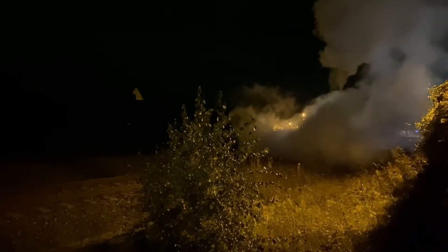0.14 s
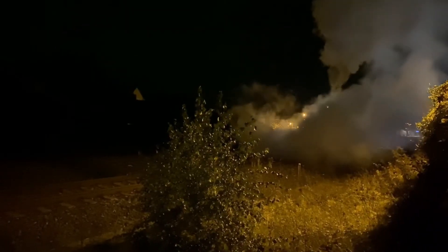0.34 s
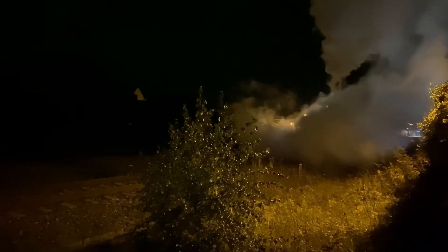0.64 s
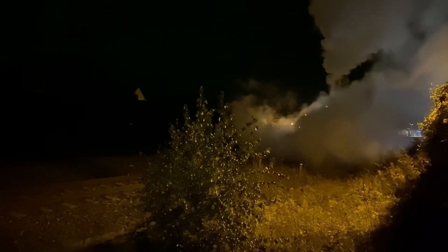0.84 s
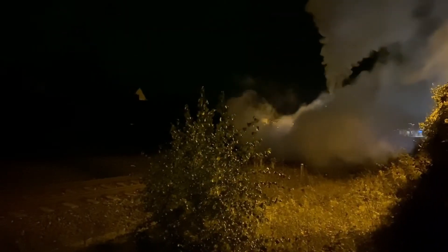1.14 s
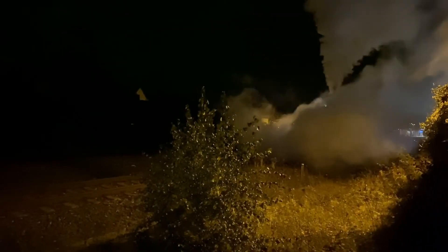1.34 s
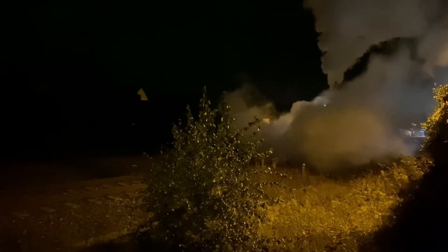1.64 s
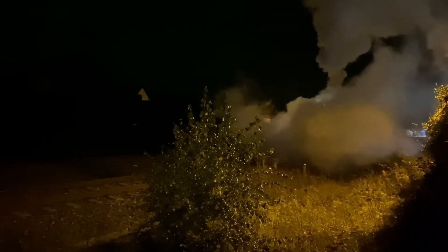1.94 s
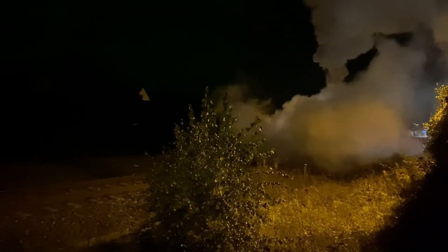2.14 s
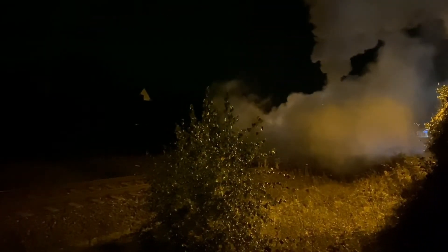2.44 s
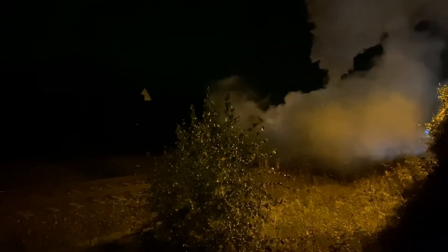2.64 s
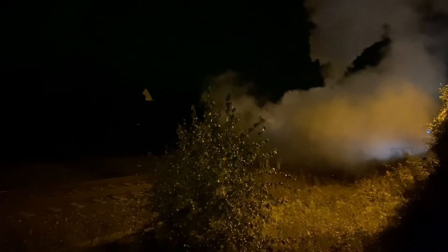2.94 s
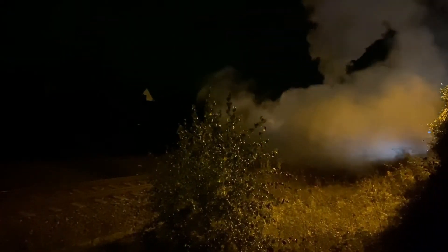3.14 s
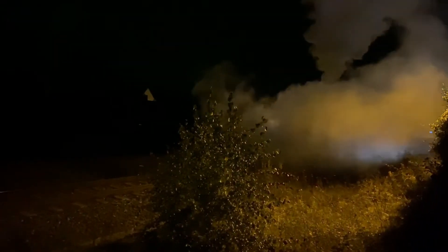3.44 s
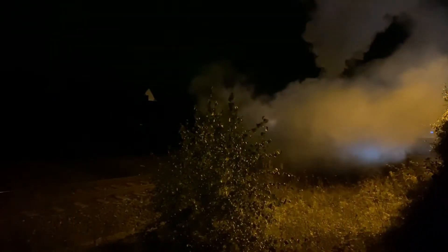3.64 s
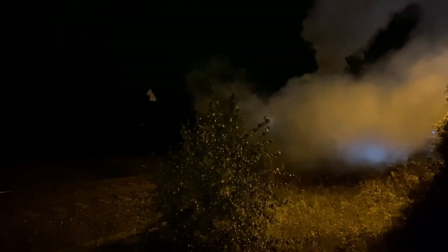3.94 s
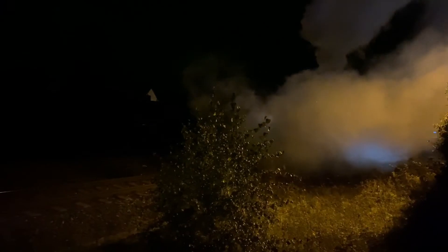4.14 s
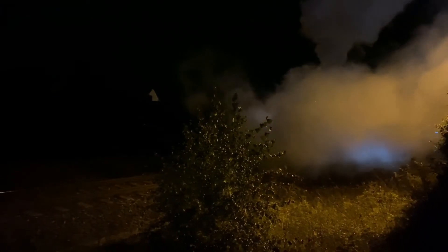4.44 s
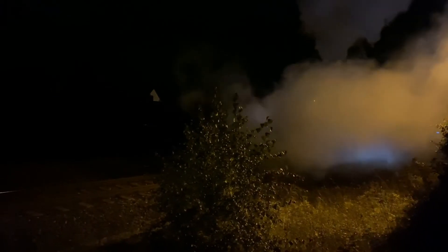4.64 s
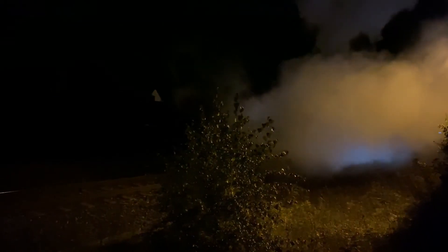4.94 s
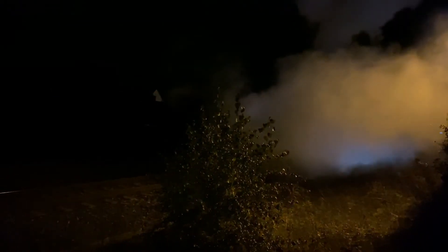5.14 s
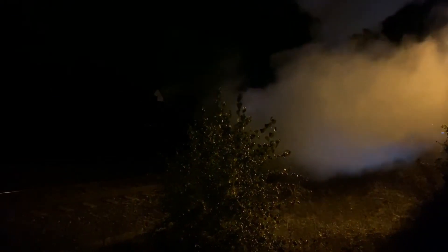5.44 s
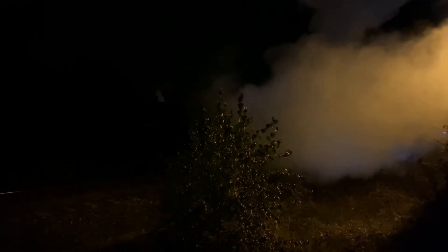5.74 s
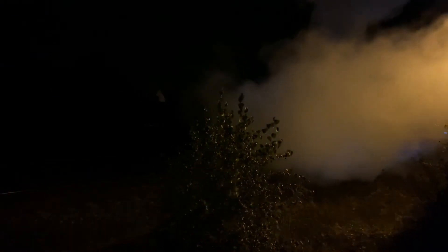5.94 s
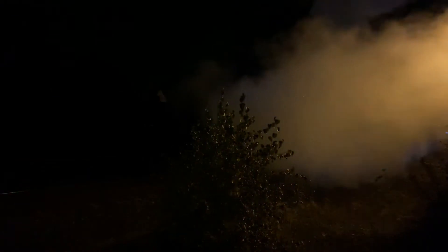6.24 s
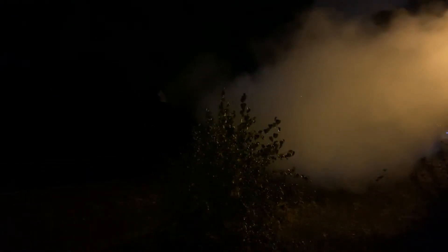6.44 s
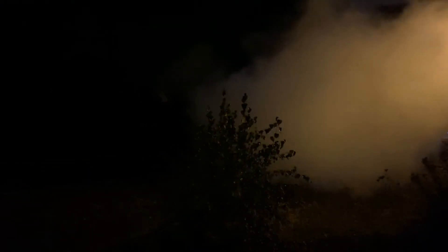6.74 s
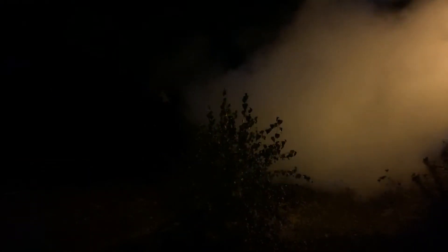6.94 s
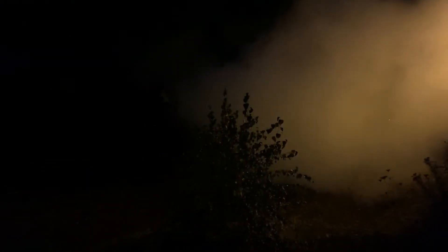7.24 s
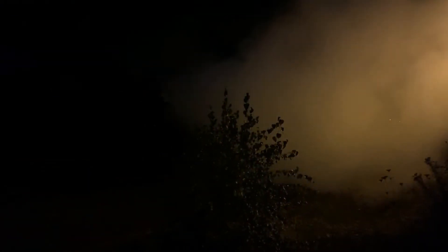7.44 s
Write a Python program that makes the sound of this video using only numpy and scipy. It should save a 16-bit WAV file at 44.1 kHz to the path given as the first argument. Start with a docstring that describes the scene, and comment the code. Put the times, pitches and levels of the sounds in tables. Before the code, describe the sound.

A steam engine blows off a loud, steady, slightly wavering hiss outdoors at night, then shuts off suddenly, leaving low rumble and soft chuffs.

```python
"""Steam blow-off at night

A steam locomotive blows off steam across a field, heard from beside a wall. The jet is coloured noise,
combed by the wall's reflection and shaken by moving air; it swells, is shut off and dies away among the
trees as decaying noise echoes. Noise makes the low rumble and soft chuffs under and after it; sine waves
make a faint hum and a wavering drone."""
import sys
import numpy as np
from scipy import signal
from scipy.fft import rfft, irfft
from scipy.io import wavfile
from scipy.ndimage import uniform_filter1d

SR = 44100
rng = np.random.default_rng(int(sys.argv[2]) if len(sys.argv) > 2 else 0)


def transcribe(u):
    """Save the signal u as a 16-bit wav file named by the first command-line argument.

    u: samples, shape (n,) or (channels, n), limited to [-1, 1]; the rate is SR.
    q: integer samples, one column per channel.
    """
    v = np.clip(np.atleast_2d(u).T, -1, 1)
    q = np.round(v * 32767).astype(np.int16)
    wavfile.write(sys.argv[1], SR, q)


N = 333836
TIME, FREQ = np.arange(N) / SR, np.fft.rfftfreq(N, 1 / SR)  # s, Hz
FRAME, HOP = 1024, 256  # short-time spectrum, samples
HISS_BAND_HZ = (2700, 6000)  # band in which the source hiss has rms 1

# Colour of the jet. Each row: frequency in Hz, relative density in dB per Hz.
JET_COLOUR = [(200, -29.5), (420, -23), (760, -3), (1300, -1.9), (1750, -0.5), (2600, -1), (3400, 0.63),
              (5000, -1), (6500, -0.5), (8100, 1.5), (9200, 0.5), (10300, -1.3), (12500, -12),
              (15000, -14.5)]


def undb(db):
    """Decibels to amplitude gain."""
    return 10 ** (np.asarray(db) / 20)


def over_time(table, t=TIME):
    """The columns of a curve table at times t, joined by straight lines."""
    s, *columns = np.transpose(table)
    return [np.interp(t, s, c) for c in columns]


def over_pitch(table, hz=FREQ):
    """The columns of a spectrum table, joined by lines on a log-frequency axis."""
    points, *columns = np.transpose(table)
    return [np.interp(np.log(hz + 1), np.log(points), c) for c in columns]


def bell(x, centre, width):
    """A smooth Gaussian bump of height 1; width is its standard deviation."""
    return np.exp(-.5 * ((x - centre) / width) ** 2)


def ramp(t, start, length):
    """Rises from 0 to 1, then holds."""
    return np.clip((t - start) / length, 0, 1)


def walk(t, rate):
    """Random values, rate of them a second, joined by straight lines."""
    return np.interp(t * rate, np.arange(2048), rng.standard_normal(2048))


def noise(colour, band=(0, SR)):
    """Spectrum of coloured noise whose rms inside the band is 1."""
    spectrum = rfft(rng.standard_normal(N)) * undb(over_pitch(colour)[0])
    in_band = (FREQ > band[0]) * (FREQ < band[1])
    return spectrum / np.std(irfft(spectrum * in_band, N))


def diffuse(colour, wide_hz, band=(0, SR)):
    """Stereo noise from all around: alike in the bass, unrelated above wide_hz."""
    side = noise(colour, band) * np.minimum(FREQ / wide_hz, 1)
    return irfft(noise(colour, band) + side * np.array([[1], [-1]]), N)


def effort_db():
    """The engine works up slowly to its full level, then eases a little."""
    idle_db, work_db, work_up_s = -58, -48, 3.9
    ease_s, ease_ramp_s, ease_db = 5.7, 0.37, -0.9
    working = idle_db + (work_db - idle_db) * ramp(TIME, 0, work_up_s)
    return working + ease_db * ramp(TIME, ease_s, ease_ramp_s)


def hum(waver, throb_db):
    """Faint tones near 200 and 320 Hz: sines whose pitch and level waver a little."""
    # Each row: frequency in Hz, level in dB relative to the engine.
    hum_tones = [(199, -18), (321, -19.5)]
    total = 0
    for hz, db in hum_tones:
        phase = 2 * np.pi * np.cumsum(hz * (1 + waver * walk(TIME, 4))) / SR
        total = total + np.sin(phase) * undb(effort_db() + db + throb_db * walk(TIME, 5))
    return np.sqrt(2) * total


def drone(waver, throb_db, count):
    """A low drone slides up and down; each of its harmonics booms when it passes a resonance."""
    # Pitch of the fundamental. Each row: time in seconds, frequency in Hz.
    drone_pitch = [(0, 40.9), (1, 42.15), (1.5, 44.9), (2.1, 47.67), (2.45, 49.8), (2.75, 52.64),
                   (3, 58.05), (3.3, 62.35), (3.55, 67.4), (4.1, 66), (4.6, 66.6), (5.0, 46.96),
                   (5.3, 41.25), (5.75, 41.23), (6.2, 44.1), (6.55, 46.7), (6.9, 49.3), (7.55, 52.5)]
    # Drone level. Each row: time in seconds, level in dB relative to the engine.
    drone_level = [(0, 2), (.7, -6.5), (1.5, 1.5), (2.4, 3), (3.3, 3), (4.4, -1), (4.8, -12), (5.15, -1),
                   (5.35, 2), (5.7, 0.5), (5.95, -2), (6.25, 1), (6.5, 3), (6.8, -0.5), (7.2, -2),
                   (7.55, -0.5)]
    # Resonances. Each row: centre in Hz, half-width in Hz, peak in dB before the drone level is added.
    booms = [(54.6, 2.2, -6.5), (83.6, 1.9, -2), (96, 4, -3), (129.2, 4.5, -8), (161, 3.2, -15.5),
             (202, 3.4, -8.5), (313.5, 15.4, -13.5)]
    hz = over_time(drone_pitch)[0]
    phase = 2 * np.pi * np.cumsum(hz * (1 + waver * walk(TIME, 14))) / SR

    def boom(f):
        """Gain at frequency f: the powers of all resonances added."""
        power = sum(undb(db) ** 2 / (1 + ((f - centre) / width) ** 2) for centre, width, db in booms)
        return np.sqrt(power)

    tone = sum(boom(k * hz) * np.sin(k * phase) for k in range(1, count + 1))
    level_db = effort_db() + over_time(drone_level)[0] + throb_db * walk(TIME, 3.7)
    return np.sqrt(2) * tone * undb(level_db)


def rumble(level_db, throb_db, wide_hz):
    """Fire and draught rumble unevenly under the hiss: low noise with a random throb."""
    # Colour of the rumble. Each row: frequency in Hz, relative density in dB per Hz.
    rumble_colour = [(22, -34), (38, -19.5), (54, 2.5), (107, -5.5), (200, -8.5), (430, -17), (700, -11.5),
                     (1030, -21.5), (1360, -19), (1550, -30), (3000, -36), (8500, -47), (10300, -45.5),
                     (15000, -70)]
    roar = diffuse(rumble_colour, wide_hz, (35, 400))
    return roar * undb(effort_db() + level_db + throb_db * walk(TIME, 11))


def puffs(table, colour, wide_hz):
    """Soft-edged bursts of steam: bell-shaped swells of coloured noise."""
    envelope = sum(undb(db) * bell(TIME, s, length) for s, db, length in table)
    return envelope * diffuse(colour, wide_hz)


def trees(x):
    """Uneven echoes from trees: decaying noise, in which the air takes the treble first."""
    # Lingering sound. Each row: frequency in Hz, level in dB relative to the hiss, 60 dB decay in seconds.
    tree_decay = [(500, -19, 3.4), (1300, -24.5, 4.2), (2320, -20.5, 2.4), (3600, -23, 1.65),
                  (5500, -16.5, 1.06), (10300, -23.5, 0.86), (15000, -23, .9)]
    # Stronger and weaker moments of the echo. Each row: lag in seconds, spread in seconds, change in dB.
    uneven_echo = [(.12, 0.018, 5), (.22, 0.018, -4), (.42, .05, -0.5)]
    hz, t, frames = signal.stft(rng.standard_normal((2, 2 * SR)), SR, nperseg=FRAME)
    db, t60 = (c[:, None] for c in over_pitch(tree_decay, hz))
    decay = np.log(1000) / t60
    db = db + sum(change_db * bell(t, lag, spread) for lag, spread, change_db in uneven_echo)
    fading = np.exp(-decay * t) * np.sqrt(2 * decay / SR)  # keeps the level apart from the decay time
    echoes = signal.istft(frames * undb(db) * fading, SR, nperseg=FRAME)[1]
    return signal.fftconvolve(x, echoes, axes=1)[:, :N]


def scatter(source, t60, coherent, drift_per_s):
    """Nearby surfaces leave a fine ripple on the hiss that drifts with the air; moving leaves blur the rest."""
    # Hiss off ground and bushes. Each row: frequency in Hz, level in dB relative to the source hiss.
    scatter_level = [(500, -12.5), (1200, -4), (2500, -2.5), (4000, -4), (6200, 0.5), (8500, -6),
                     (12000, -15.5)]
    echoes = rng.standard_normal((3, 2, SR // 8)) * undb(-60 * TIME[:SR // 8] / t60)
    echoes = echoes / np.linalg.norm(echoes, axis=-1, keepdims=True)
    # the mix of three echo sets drifts while its power stays even
    weights = np.array([walk(TIME, drift_per_s) for _ in echoes])
    weights = weights / np.linalg.norm(weights, axis=0)
    hiss = [irfft(source, N)]
    rippled = rfft(sum(w * signal.oaconvolve(hiss, e, axes=1)[:, :N] for w, e in zip(weights, echoes)))
    blurred = np.array([noise(JET_COLOUR, HISS_BAND_HZ) for _ in range(2)])
    share = np.clip(coherent, 0, 1)
    return undb(over_pitch(scatter_level)[0]) * (np.sqrt(share) * rippled + np.sqrt(1 - share) * blurred)


def valve_db(t):
    """The valve holds a steady flow and opens further; late on, the pressure sags."""
    flow_db = -33
    open_s, open_ramp_s, open_db = 4.41, 0.31, 5
    sag_s, sag_db_per_s = 6.215, 15
    # Brief dips, one of them a lift. Each row: centre in seconds, change in dB, spread in seconds.
    dips = [(3.03, 1, 0.045), (4.26, -1.5, 0.071), (4.87, -2.5, 0.034), (5.862, -1.5, 0.056)]
    flow = flow_db + open_db * ramp(t, open_s, open_ramp_s) - sag_db_per_s * np.maximum(t - sag_s, 0)
    return flow + sum(db * bell(t, s, length) for s, db, length in dips)


def sizzle_db(hz, t, gust_db):
    """The top of the hiss surges and gusts, and fails first as the valve closes."""
    sizzle_hz, width_hz = 10600, 2470
    dull_s, dull_db_per_s = 6.3, 79.5
    # Surges. Each row: centre in seconds, rise in dB, spread in seconds, centre in Hz.
    surge_rows = [(0.1, 6, 0.12, 10400), (1.12, 6, 0.04, 11500), (1.484, 1.5, 0.11, 12800),
                  (2.352, 10, 0.099, 11500), (2.659, 8.5, 0.11, 10300), (2.913, 7.5, 0.054, 10900),
                  (3.258, 7.5, 0.059, 10200), (3.688, 3.5, 0.048, 10850), (4.415, 7.5, 0.03, 9900),
                  (4.68, 1, 0.063, 10800), (5.078, 6.5, 0.045, 11500), (5.362, 6, 0.098, 10500),
                  (5.717, 6.5, 0.07, 11300), (6.233, 8.5, 0.098, 10970)]
    surges = sum(db * np.outer(bell(hz, f, width_hz), bell(t, s, length)) for s, db, length, f in surge_rows)
    gusts = gust_db * walk(t, 9) - dull_db_per_s * np.maximum(t - dull_s, 0)
    return surges + np.outer(bell(hz, sizzle_hz, width_hz), gusts)


def rings_db(hz, t):
    """Narrow bands ring out of the hiss or sink into it, drawing some power from their neighbours."""
    # Ringing or sunken bands. Each row: centre in seconds, spread in seconds, frequency in Hz,
    # width in Hz, glide in Hz per second, change in dB before the draw.
    ring_rows = [(.05, 0.2, 7000, 1510, -3, 2.5), (.25, 0.34, 4200, 563, 0, 8.5),
                 (.6, .25, 2930, 90, -100, 6), (.6, 0.46, 3260, 70, -100, -5),
                 (1.08, 0.15, 4150, 200, 300, -4.5), (1.25, 0.22, 2680, 129, 0, -4.5),
                 (1.38, 0.24, 1326, 45, -79.5, 11.5), (1.42, 0.48, 1645, 70, -170, 5),
                 (2.15, 0.4, 1290, 50, -70, 5.5), (2.25, 0.6, 2249, 100.4, 30, 8),
                 (2.28, 0.15, 6600, 400, 0, 4.5), (3.1, .5, 3330, 140, 0, 3), (3.45, .25, 2560, 160, 0, 4),
                 (3.7, .22, 4324, 221.4, 0, 3.5), (3.848, 0.22, 5300, 350, 0, -5),
                 (3.85, 0.21, 3680, 160, 0, 2), (4.68, 0.12, 1712, 109, -0.5, 0),
                 (4.68, .1, 4080, 200, 0, 6), (4.68, .1, 6000, 450.6, 0, 3),
                 (4.899, 0.16, 3120, 180, -200, 5), (5.38, 0.13, 2580, 90, 0, 6.5),
                 (5.48, 0.13, 1810, 130, 1, 6.5), (5.7, 0.16, 4600, 280, 0, 8),
                 (6.3, .15, 3330, 220, 0, 4.5), (6.3, 0.14, 4670, 200, -4, 5.5), (6.3, .22, 1390, 60, 0, 4),
                 (6.3, 0.16, 1720, 90, 200, 4)]
    # A hollow that sinks in pitch. Each row: time in seconds, frequency in Hz, change in dB before the draw.
    hollow = [(.9, 2750, 1.5), (1.45, 2150, 1), (1.7, 1880, -15), (2.1, 1790, -4), (2.8, 1660, 0),
              (3.4, 1570, -4), (4.0, 1470, -4.5), (4.7, 1370, -4.5), (5.5, 1290, -1.5), (6.0, 1220, -13),
              (6.4, 1150, -18)]
    hollow_width_hz = 48
    ring_draw = 0.089  # scales the dB given back across neighbouring bands
    rings = 0
    for s, length, f, width, glide, db in ring_rows:
        rings = rings + db * bell(hz[:, None], f + glide * (t - s), width) * bell(t, s, length)
    hollow_hz, hollow_db = over_time(hollow, t)
    rings = rings + hollow_db * bell(hz[:, None], hollow_hz, hollow_width_hz)
    nearby_power = uniform_filter1d(undb(rings) ** 2, size=33, axis=0)
    return rings - ring_draw * 10 * np.log10(nearby_power)


def blow(x, flutter_db, shimmer_db, gust_db):
    """The valve drives the flow, turbulence shakes the whole jet and moving air makes each band shimmer."""
    # Treble that fades and returns on its way over the field. Each row: time in seconds, level in dB.
    treble = [(0, -31.5), (.25, -32), (1.0, -39), (1.4, -35), (1.65, -35.5), (2.4, -30), (2.9, -35),
              (3.25, -32.5), (3.8, -29), (4.15, -34), (4.45, -34.5), (4.68, -33), (4.87, -29.5),
              (5.05, -25), (5.5, -28.5), (5.9, -32), (6.17, -22.5), (6.35, -22.5)]
    # Zones from roar to sizzle. Each row: frequency in Hz, change in dB, share of the treble's fading, 0-1.
    jet_zones = [(1160, -1.13, 0.08), (1700, 0, 0.1), (2200, -1, 0.81), (2940, -1.44, 0.83),
                 (3600, -1, 0.84), (5200, -2.5, 0.64), (7900, -2, 0.15)]
    shut_s, shut_db_per_s = 6.376, 413
    hz, t, frames = signal.stft(x, SR, nperseg=FRAME, noverlap=FRAME - HOP)
    flow = valve_db(t)
    zone_db, fading = (c[:, None] for c in over_pitch(jet_zones, hz))
    # each zone leans from the flow towards the treble curve by its share
    tone = zone_db + fading * (over_time(treble, t)[0] - flow)
    eddies = [(f, *walk(t, 7)) for f in np.geomspace(600, 15000, 40)]
    shimmer = shimmer_db * np.transpose(over_pitch(eddies, hz))
    flutter = flutter_db * walk(t, 35)
    shut = shut_db_per_s * np.maximum(t - shut_s, 0)
    db = flow + tone + sizzle_db(hz, t, gust_db) + rings_db(hz, t) + shimmer + flutter - shut
    return signal.istft(frames * undb(db), SR, nperseg=FRAME, noverlap=FRAME - HOP)[1][:, :N]


def jet():
    """Steam noise arrives straight, off the wall (a comb of hollow bands) and scattered."""
    # Straight path to two ports. Each row: frequency in Hz, lag of the left port in ms,
    # left gain in dB, right gain in dB.
    ports = [(563, 0.014, 3.5, 5.5), (1810, 0.031, 1, -5), (3040, 0.033, -1, -9), (4960, 0.036, -0.5, -1),
             (8750, 0.07, -5, 1), (9900, 0.098, -1.5, -2), (11960, 0.12, 2.5, 2),
             (14100, 0.155, -1.5, -1.5)]
    # Reflection from the wall. Each row: frequency in Hz, left lag in ms, right lag in ms,
    # left gain in dB, right gain in dB.
    wall = [(600, 1.9, 2.25, -27.5, -14), (950, 2.08, 2.084, -2.5, -2.5), (1500, 1.86, 2.053, -11.5, 4),
            (2040, 1.887, 2.012, -14.5, 4.5), (2690, 1.825, 2.08, -14.5, 1), (3420, 1.79, 1.995, -8, -5),
            (4500, 1.794, 1.998, -16.5, -5.5), (5150, 1.81, 1.95, -15, -1), (6100, 2.1, 1.97, -17, -8.5),
            (9200, 1.75, 1.93, -27.5, -13.5)]
    # Peaks and notches of the right port. Each row: centre in Hz, width in Hz, change in dB.
    right_port = [(6970, 120, -1.5), (7740, 140, -1.5), (8200, 160, 4), (8980, 300, -3)]
    source = noise(JET_COLOUR, HISS_BAND_HZ)
    port_ms, *port_db = over_pitch(ports)
    left_ms, right_ms, *wall_db = over_pitch(wall)
    turn = -2j * np.pi * FREQ / 1000  # phase turn per ms of lag
    straight = undb(port_db) * np.exp(turn * port_ms * np.array([[1], [0]]))
    reflected = -undb(wall_db) * np.exp(turn * np.array([left_ms, right_ms]))
    scattered = scatter(source, t60=0.069, coherent=0.65, drift_per_s=2.4)
    left, right = source * (straight + reflected) + scattered
    right = right * undb(sum(db * bell(FREQ, hz, width) for hz, width, db in right_port))
    return blow(irfft([left, right], N), flutter_db=0.91, shimmer_db=1.5, gust_db=2.0)


def scene():
    """The jet and its echoes over the sounds of the engine, which stands a little to the right."""
    # Soft chuffs, and a wisp of steam between the last two. Each row: centre in seconds,
    # level in dB before the pan, spread in seconds.
    chuffs = [(.85, -57, 0.027), (1.1, -50, 0.029), (5.3, -46, 0.059), (5.64, -53, .04),
              (6.585, -46, 0.056), (7.118, -43, .03), (7.53, -46, 0.044)]
    wisps = [(7.21, -53, 0.036)]
    # Their colours. Each row: frequency in Hz, relative density in dB per Hz.
    chuff_colour = [(40, -4), (100, 5), (250, -11), (700, -7.5), (1400, -46), (3000, -37.5), (9000, -55)]
    wisp_colour = [(300, 11), (1000, 5), (3500, -6), (7000, -17), (10500, -17), (15000, -34)]
    engine_pan_db = -1  # left minus right
    hiss = jet()
    engine = rumble(level_db=-0.43, throb_db=1.5, wide_hz=1250)
    engine = engine + puffs(chuffs, chuff_colour, wide_hz=1800)
    wisp = puffs(wisps, wisp_colour, wide_hz=1500)
    tones = drone(waver=0.0031, throb_db=1.8, count=8) + hum(waver=.01, throb_db=2.5)
    pan = undb(engine_pan_db / 2 * np.array([[1], [-1]]))
    return hiss + trees(hiss) + pan * (engine + wisp + tones)


def record(dry):
    """The recorder cuts the top with a steep low-pass filter."""
    top_hz = 15200
    return signal.sosfilt(signal.ellip(10, .2, 70, top_hz, fs=SR, output="sos"), dry)


dry = scene()
out = record(dry)
transcribe(out)
```